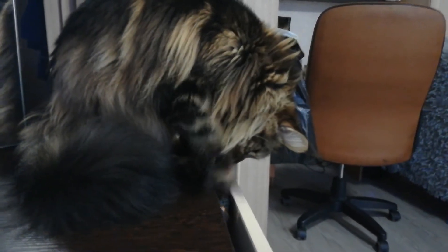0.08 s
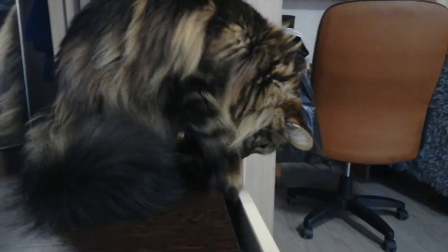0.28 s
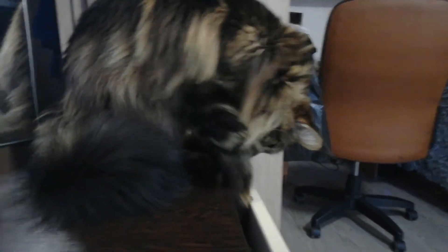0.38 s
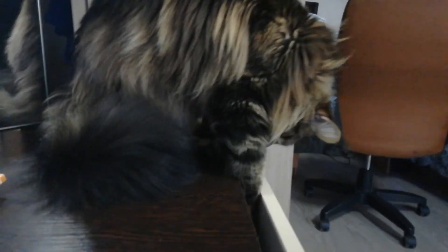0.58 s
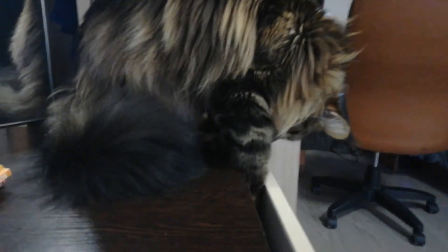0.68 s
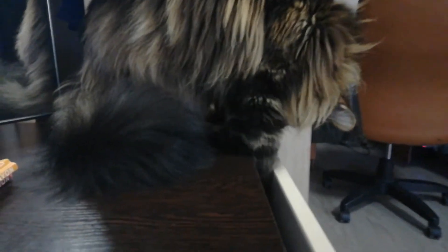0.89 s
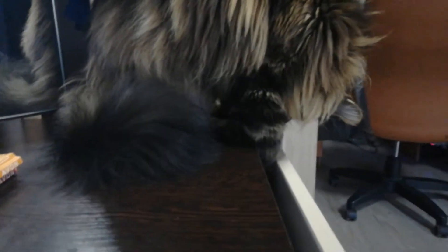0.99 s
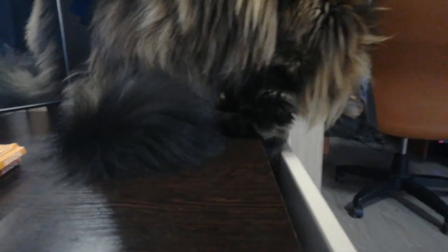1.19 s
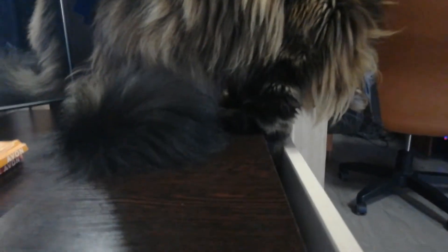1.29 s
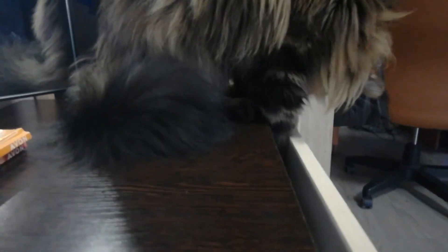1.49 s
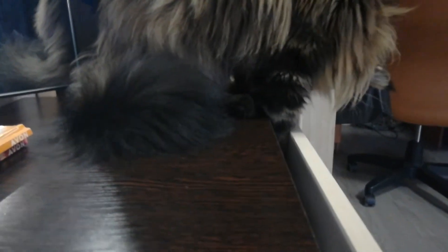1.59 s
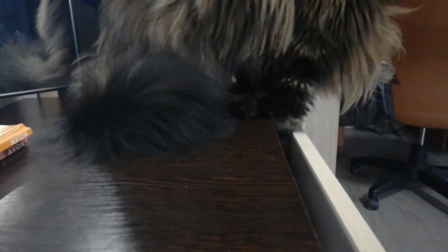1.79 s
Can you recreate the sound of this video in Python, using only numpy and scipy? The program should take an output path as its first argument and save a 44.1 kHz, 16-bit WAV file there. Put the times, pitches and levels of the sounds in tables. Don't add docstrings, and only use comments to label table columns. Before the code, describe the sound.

Cat paw knocks small hard objects in a gap at a desk edge: one sharp loud clack, lighter ticks and scrapes, then a strong double clack and fading taps, close stereo microphone in a furnished room.

```python
import sys
import numpy as np
from scipy import signal
from scipy.fft import rfft, irfft
from scipy.io import wavfile

SR = 44100
rng = np.random.default_rng(int(sys.argv[2]) if len(sys.argv) > 2 else 0)


def how_loud(loudness_db):
    steps = np.asarray(loudness_db, float) / 20
    return 10 ** steps


def dump_mix(stems):
    frames = np.atleast_2d(stems).T
    limited = np.clip(frames, -1, 1)
    pcm = np.round(limited * 32767).astype(np.int16)
    wavfile.write(sys.argv[1], SR, pcm)


N = 81585


def at_hz(points, hz):
    table = np.array(points)
    return np.interp(np.log(hz), np.log(table[:, 0]), table[:, 1])


def rms_one(x):
    return x / np.sqrt(np.mean(x ** 2) + 1e-20)


def ring(x, hz, t60):
    r, w = how_loud(-60 / (t60 * SR)), 2 * np.pi * hz / SR
    return signal.lfilter([0, np.sin(w)], [1, -2 * r * np.cos(w), r * r], x + 1e-18)


# [t/s, note peak level/dB, note f/Hz, crack level/dB, cycles to fall 60 dB]
KNOCKS = [(0.1273, -37, 1380, -41, 10.5), (0.2142, -13, 1407, -14, 5), (0.2205, -15, 1996, -28.5, 5.9),
          (0.356, -33, 2200, -46, 13.7), (0.4612, -37, 1720, -64.5, 8.4), (0.4714, -34, 1400, -44.5, 7.1),
          (0.506, -45.5, 1418, -71, 9.2), (0.5482, -47, 1400, -83, 7.5), (0.715, -33.5, 1560, -60, 7),
          (0.7251, -31.5, 1750, -49, 8), (0.7327, -27, 1446, -37.5, 9.4), (0.7794, -50, 1460, -48, 6.2),
          (0.8854, -27, 1723, -43, 8), (0.9165, -43, 1640, -68, 6.5), (0.9246, -37, 2200, -37, 8.7),
          (1.0017, -12, 1627, -21.5, 6.3), (1.019, -40, 1580, -38, 8.5), (1.0451, -23, 1700, -56, 3.9),
          (1.0562, -16.5, 1470, -34.5, 7.9), (1.0566, -13, 2004, -17.5, 7.7), (1.077, -32, 1330, -36, 9.6),
          (1.169, -35, 1750, -54.5, 9), (1.2088, -33, 2107, -56, 6.5), (1.4216, -42.5, 1246, -54.5, 8),
          (1.4367, -45.5, 1440, -72, 6.5), (1.4416, -35.5, 1570, -45, 6.3), (1.5685, -28, 1680, -54.5, 6.3),
          (1.5872, -20, 1798, -37, 11), (1.5966, -27.5, 1950, -47, 5.6)]
# [t/s, peak level/dB, f/Hz]
HOLLOW = [(.13, -48.5, 690), (.168, -66, 484), (.2145, -25, 950), (.218, -33, 414), (.357, -42, 650),
          (.356, -40, 950), (.464, -42, 881), (.7145, -30.5, 808), (.733, -33.5, 890), (.924, -36.5, 930),
          (1.002, -37, 950), (1.055, -25.5, 852), (1.058, -34.5, 668), (1.172, -40, 860),
          (1.174, -44.5, 444), (1.215, -49, 860), (1.424, -46.5, 880), (1.442, -42.5, 950),
          (1.587, -31.5, 879), (1.595, -44, 870)]
HOLLOW_CYCLES = 6.5
# [t/s, peak level/dB, f/Hz, cycles to fall 60 dB]
RINGS = [(.128, -40, 230.4, 3.7), (.145, -47, 260, 3.3), (.164, -52, 228, 5.5), (.2165, -33, 357, 5.9),
         (.216, -36.5, 570, 7.5), (.248, -32.5, 220.5, 5.2), (.272, -42, 228, 5), (1.0, -33, 218, 6.1),
         (1.003, -40, 416, 6.5), (1.002, -39.5, 630, 7), (1.017, -31.5, 240, 6.5), (1.053, -30, 230, 3.9),
         (1.056, -40, 400, 7.4), (1.078, -40.5, 402, 7.1), (1.077, -36.5, 860, 9.5), (1.171, -38, 233.3, 6),
         (1.203, -44, 208, 6), (1.1, -42, 310, 6.2), (.892, -47, 880, 16), (.127, -43, 3550, 17),
         (.216, -22, 1904, 22), (.356, -46, 3800, 18), (.472, -41, 2910, 16), (.472, -42, 3950, 22),
         (.483, -56, 2100, 12), (.518, -52, 1350, 9.5), (.733, -42.5, 3380, 22), (.78, -46, 4720, 22),
         (.9245, -35, 1450, 7.5), (1.0015, -25.5, 3720, 18), (1.002, -33, 5610, 34),
         (1.056, -28.5, 5070, 25), (1.442, -45, 3670, 19.6), (1.5885, -29.5, 1500, 10.2),
         (1.617, -38.5, 2150, 16), (1.638, -47, 2050, 12), (.354, -40, 1500, 5.9), (.93, -44, 620, 6.6),
         (.722, -44.5, 520, 6.6), (1.71, -57, 1200, 5.5)]
SCATTERED = .55


def knocks():
    heard, sent = np.zeros((2, 2, N + SR))
    hollow = [(*row, HOLLOW_CYCLES) for row in HOLLOW]
    for rows, low, high in ((KNOCKS, .4, 1), (hollow, -.5, .5), (RINGS, -.2, .2)):
        for s, db, hz, *_, cycles in rows:
            draw = rng.uniform(low, high)
            add(heard, s, note(db, hz, cycles, draw), column=1)
            short = note(db, hz, cycles * SCATTERED, draw)
            add(sent, s, short / np.sqrt(SCATTERED), column=1)
    for s, _, _, crack_db, _ in KNOCKS:
        ragged, even = crack(s, crack_db)
        add(heard, s, ragged, column=2)
        start = int(s * SR)
        sent[:, start:start + even.shape[1]] += even
    return heard[:, :N], sent[:, :N]


NOTE_SWELL = 2.6
PARTNER_DB, PARTNER_SPREAD = -8, 0.34


def note(db, hz, cycles, draw):
    t = np.arange(2048) / SR

    def mode(f):
        swell = (f * t) ** NOTE_SWELL
        return swell * how_loud(-60 * f * t / cycles) * np.sin(2 * np.pi * f * t)

    x = mode(hz) + how_loud(PARTNER_DB) * mode(hz * (1 + PARTNER_SPREAD * draw))
    return how_loud(db) * np.tile(x / np.abs(x).max(), (2, 1))


# [f/Hz, level/dB per Hz]
CRACK = [(200, -34.5), (500, -18), (1000, -10.5), (2000, -13.5), (4700, -14.5), (6000, -9), (8500, -9.5),
         (12500, -21), (14600, -26.5), (16400, -40)]
# [f/Hz, level/dB per Hz]
TAP = [(500, -34), (1290, -11.5), (2200, -5), (3040, -18), (4720, -13.5), (5300, -15.5), (8170, -8),
       (13000, -34.5), (16000, -41.5)]
# [f/Hz, width/Hz, level/dB]
CRACK_PEAKS = [(3540, 540, 5)]
# [t/s, f/Hz, width/Hz, fall/s]
BRIGHT = [
    (.22, 7160, 700, 0.003),
    (1.0, 7100, 1300, .0028),
    (1.056, 7850, 1600, 0.0017),
]
HARD_DB = -30
BRIGHT_DB, CRACK_DB = 12, 9.5
CRACK_RISE_S, TAP_FALL_S = 0.00054, 0.0023
CRACK_OWN = 0.38
ROOM_BLUR = 2.5


def crack(s, db):
    t, hz = np.arange(2048) / SR, np.fft.rfftfreq(2048, 1 / SR) + 1
    hard = db > HARD_DB
    when, bright_hz, bright_width, fall_s = np.transpose(BRIGHT)
    centre, broad = np.interp(s, when, bright_hz), np.interp(s, when, bright_width)
    peaks = CRACK_PEAKS + [(centre, broad, BRIGHT_DB * hard)]
    resonance = sum(top / (1 + (2 * (hz - f) / width) ** 2) for f, width, top in peaks)
    colour = how_loud(at_hz(CRACK if hard else TAP, hz) + resonance)

    noise = rng.standard_normal((3, 2048))
    noise = rms_one(irfft(rfft(noise[0] + CRACK_OWN * noise[1:]) * colour))
    off = (2 * (hz - centre) / broad) ** 2
    blur_db = hard * BRIGHT_DB * (.5 / (1 + off / ROOM_BLUR ** 2) - 1 / (1 + off))
    even = np.tile(np.roll(irfft(colour * how_loud(blur_db)), 64), (2, 1))

    fall = np.interp(s, when, fall_s) if hard else TAP_FALL_S
    shape = (1 - np.exp(-t / CRACK_RISE_S)) * np.exp(-t / fall)
    gain = how_loud(db + CRACK_DB)
    return gain * noise * shape, gain * rms_one(even) * np.sqrt(np.mean(shape ** 2))


# [t/s, left minus right level/dB of notes, of cracks, left crack's lead/samples]
SIDE_OF = [(.13, 0.5, 2, 3.8), (.215, 0, -2.5, 4.08), (.47, 0, -0.5, 3.3), (.73, -1.5, -1, 2.72),
           (.89, 1, 0, 1.83), (1.0, 0, -0.5, 1.03), (1.06, -0.5, 3, 1.2), (1.45, 1, -3.5, .6),
           (1.59, -1, 0, .3)]
# [f/Hz, left minus right level/dB]
PORTS = [(250, 0.5), (500, 6), (2400, 4), (3700, -4.5), (9200, -5.5), (10800, 6), (12300, 6), (14000, -5)]
NOTE_LAG = -2.6
BOUNCE_S, BOUNCE_DB = .0047, -12


def add(out, s, pair, column):
    rows, length = np.transpose(SIDE_OF), pair.shape[1]
    pan = np.interp(s, rows[0], rows[column])
    lag = -np.interp(s, rows[0], rows[3]) if column == 2 else NOTE_LAG
    f = np.fft.rfftfreq(length)
    tilt = how_loud((pan + at_hz(PORTS, f * SR + 1)) / 2)
    left = tilt * np.exp(-2j * np.pi * f * lag)
    pair = irfft(rfft(pair) * [left, 1 / tilt], length)
    for when, gain in ((s, 1), (s + BOUNCE_S, how_loud(BOUNCE_DB))):
        start = int(when * SR)
        out[:, start:start + length] += gain * pair


# [t/s, upper modes level/dB, lower modes level/dB]
THUMPS = [(0.127, -39, -42), (0.164, -62.5, -67.5), (.215, -22.5, -35.5), (0.355, -48, -50),
          (.468, -45, -52), (0.545, -51, -53), (0.488, -48, -56), (.68, -58.5, -65.5), (0.732, -44.5, -49),
          (0.779, -51, -45.5), (0.799, -75, -42.5), (0.925, -42, -49), (1.001, -33, -46), (1.055, -43, -40),
          (1.17, -44, -48.5), (1.231, -60, -46.5), (1.274, -68, -51.5), (1.441, -54.5, -63.5),
          (1.589, -54.5, -55)]
# [t/s, level/dB]
PRESSES = [(0.124, -57.5), (0.218, -49), (.3, -62.5), (1.008, -52.5), (1.06, -52), (1.12, -68), (1.65, -54),
           (1.72, -66)]
# [f/Hz, level/dB, t60/s]
DESK = [(203, -1.5, .22), (233.7, 2, 0.091), (307.6, 0.5, 0.079), (374.5, -9, 0.06), (433, -10.5, .06)]
# [f/Hz, level/dB, t60/s]
DESK_LOWER = [(124, -4.5, 0.2), (152, 2, 0.091)]
# [f/Hz, level/dB, t60/s]
FRAME = [(62.2, 8.7, 0.28), (92, 4, 0.18)]
SWELL_CYCLES = 8.7
DESK_LEAD = 10


def desk():
    out = 0
    s, upper, lower = np.transpose(THUMPS)
    sway_s, sway = np.transpose(PRESSES)
    for when, db, modes in ((s, upper, DESK), (s, lower, DESK_LOWER), (sway_s, sway, FRAME)):
        draw = rng.normal(0, 1, (len(when), len(modes)))
        for k, (hz, mode_db, t60) in enumerate(modes):
            clicks = np.zeros(N)
            clicks[(when * SR).astype(int)] = how_loud(db + mode_db + 2 * draw[:, k]) * (-1) ** k
            swelling = ring(ring(clicks, hz, t60), hz, SWELL_CYCLES / hz)
            out = out + swelling * 14 * hz / (SWELL_CYCLES * SR)
    k = np.arange(N)
    return np.array([out, np.interp(k - DESK_LEAD, k, out)])


# [t/s, length/s, rasp level/dB, hiss level/dB]
SCRAPES = [(0.329, 0.042, -47.5, -58), (0.364, .08, -66, -68), (0.456, 0.035, -48, -62),
           (0.72, 0.11, -54, -65), (0.891, 0.073, -49.5, -55.5), (1.16, 0.068, -52, -90),
           (1.219, 0.088, -57, -62), (1.289, 0.077, -64, -70.5), (1.349, 0.094, -62, -72.5),
           (1.6, 0.05, -75, -56.5), (1.814, 0.045, -73, -64)]
# [f/Hz, width/Hz, level/dB]
SCRAPE_BODY = [(950, 200, -2), (1570, 220, 12.5), (2200, 290, -1.5), (3500, 300, -0.7)]
# [f/Hz, width/Hz, level/dB]
HISS_BODY = [(4470, 1800, -2), (6800, 1200, 4), (7500, 800, -23)]
GRAINS_PER_S = 1500


def scrapes():
    t, out = np.arange(N) / SR, 0
    happens = rng.random((2, N)) < GRAINS_PER_S / SR
    strength = how_loud(2.7 * np.minimum(rng.exponential(1, (2, N)), 4))
    grains = happens * strength * rng.choice([-1, 1], (2, N))
    grains = grains[0] + .5 * grains[1] * np.array([[1], [-1]])
    fur = rng.standard_normal((2, N))
    for column, source, body in ((2, grains, SCRAPE_BODY), (3, fur, HISS_BODY)):
        stroke, sound = 0, 0
        for row in SCRAPES:
            progress = np.clip((t - row[0]) / row[1], 0, 1)
            stroke = stroke + how_loud(row[column]) * np.sin(np.pi * progress)
        for hz, width, db in body:
            t60 = np.log(1000) / (np.pi * width)
            sound = sound + how_loud(db) * rms_one(ring(source, hz, t60))
        out = out + stroke * rms_one(sound)
    return out


# [f/Hz, t60/s]
ROOM_T60 = [(150, 0.3), (500, 0.29), (1500, 0.27), (4000, 0.35), (8000, 0.29), (14000, 0.6)]
# [f/Hz, level/dB against direct sound]
ROOM_DB = [(200, -13), (500, -5), (1500, -14.5), (4000, -7.5), (8000, -15), (14000, -28)]
ROOM_RISE_S = 0.0056


def room(x):
    t = np.arange(SR // 2) / SR
    white, tail = rng.standard_normal((2, 2, len(t))), 0
    for k, (hz, sos) in enumerate(bands()):
        shape = (1 - np.exp(-(t / ROOM_RISE_S) ** 2)) * how_loud(-60 * t / at_hz(ROOM_T60, hz))
        shape = shape / np.sqrt(np.sum(shape ** 2))
        pair = alike_pair(*signal.sosfilt(sos, white[k % 2]), hz)
        tail = tail + how_loud(at_hz(ROOM_DB, hz)) * pair * shape
    return signal.fftconvolve(x, tail, axes=1)[:, :N]


def bands():
    edges = 22 * 2 ** np.arange(0, 9.7, .5)
    return [(np.sqrt(a * b), signal.butter(2, [a, b], "band", fs=SR, output="sos"))
            for a, b in zip(edges, edges[1:])]


# [f/Hz, likeness, 1 = same]
LIKENESS = [(60, 1.5), (240, 0.57), (950, -0.54), (3770, 0.19), (15000, -4.5)]


def alike_pair(mid, side, hz):
    c = np.clip(at_hz(LIKENESS, hz), 0, 1)
    same, apart = np.sqrt(1 + c) * mid, np.sqrt(1 - c) * side
    return np.array([same + apart, same - apart])


# [f/Hz, level/dB]
FLOOR = [(15, -38), (25, 3), (117, 8), (212, 0), (363, -9.5), (1480, -10.5), (2910, -18.5), (7710, -20.5),
         (16000, -29)]
FLOOR_DB = -59.5


def floor():
    white, hum = rng.standard_normal((2, 2, N + SR // 4)), 0
    for k, (hz, sos) in enumerate(bands()):
        settled = signal.sosfilt(sos, white[k % 2])[:, -N:]
        hum = hum + how_loud(at_hz(FLOOR, hz)) * alike_pair(*settled, hz)
    return how_loud(FLOOR_DB) * rms_one(hum)


def scene():
    heard, sent = knocks()
    rest = desk() + scrapes()
    return heard + rest + room(sent + rest) + floor()


def low_pass(x):
    return signal.sosfilt(signal.butter(12, 16550, fs=SR, output="sos"), x)


CEILING = .97
LOW_CUT_HZ, CUTOFF_HZ = 40, 16700


def record(dry):
    rounded = CEILING * np.tanh(dry / CEILING)
    treble_cut = signal.cheby2(10, 60, CUTOFF_HZ, fs=SR, output="sos")
    bass_cut = signal.butter(2, LOW_CUT_HZ, "high", fs=SR, output="sos")
    mix = signal.sosfilt(np.vstack([treble_cut, bass_cut]), rounded)
    return low_pass(mix)


dry = scene()
out = record(dry)
dump_mix(out)
```